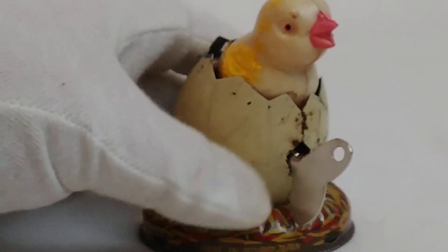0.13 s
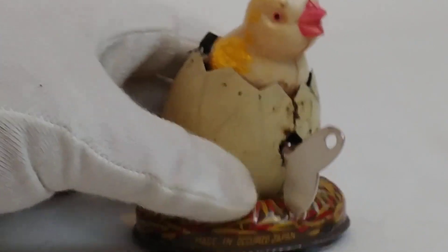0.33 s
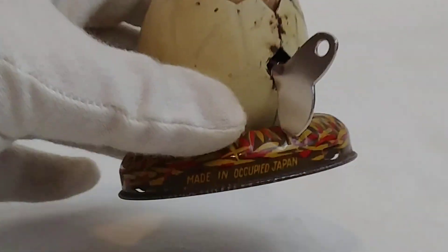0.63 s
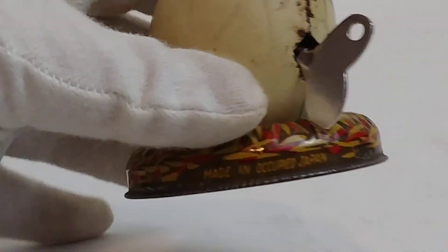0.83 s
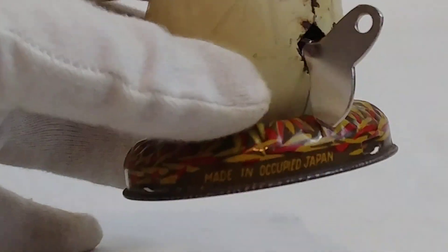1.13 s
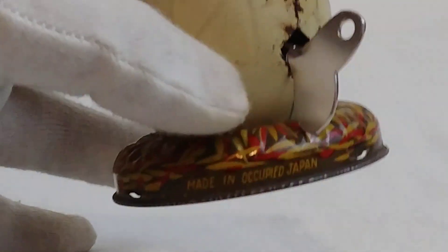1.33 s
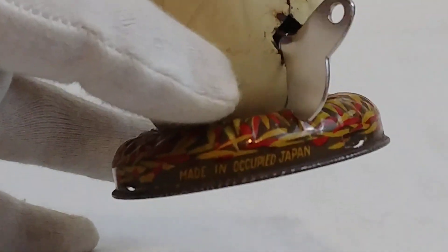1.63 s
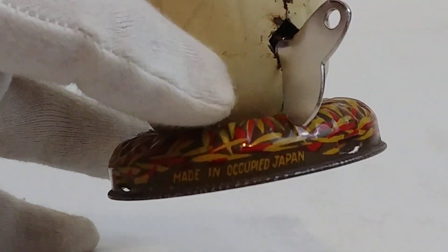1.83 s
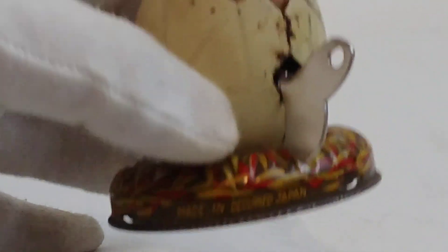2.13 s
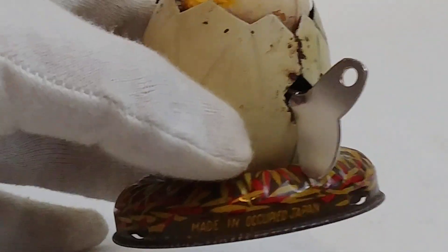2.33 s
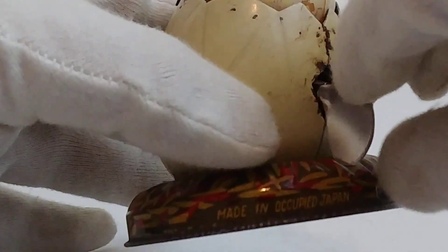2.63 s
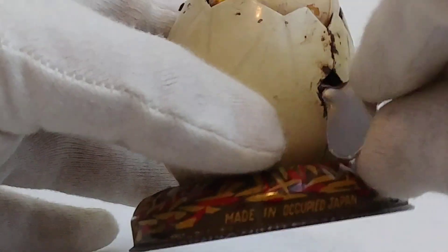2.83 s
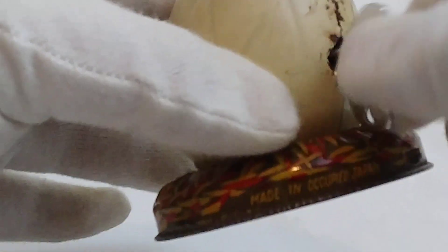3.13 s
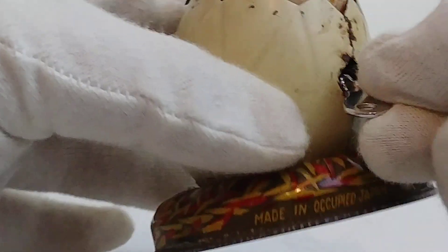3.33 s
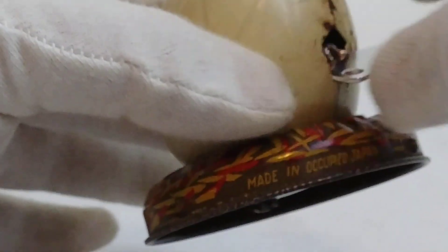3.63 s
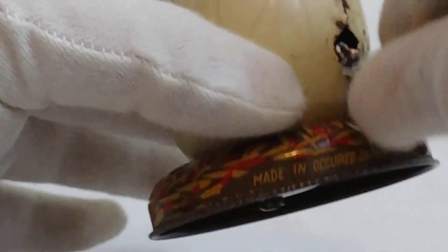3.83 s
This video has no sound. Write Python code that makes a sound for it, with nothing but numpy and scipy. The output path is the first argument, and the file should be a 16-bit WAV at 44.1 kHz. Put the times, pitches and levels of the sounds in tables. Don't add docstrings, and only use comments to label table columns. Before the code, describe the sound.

A metal key winds a small tin toy: after soft glove rustle and sparse taps, a dense burst of uneven bright clicks with spring rattle, a short lull, then a second winding begins, close in a quiet room.

```python
import sys
import numpy as np
from scipy import signal
from scipy.fft import rfft, irfft
from scipy.io import wavfile
from scipy.ndimage import uniform_filter1d

SR = 44100
rng = np.random.default_rng(int(sys.argv[2]) if len(sys.argv) > 2 else 0)


def put_to_file(sound):
    columns = np.atleast_2d(sound).T
    safe = np.clip(columns, -1, 1)
    whole_steps = np.round(safe * 32767)
    wavfile.write(sys.argv[1], SR, whole_steps.astype(np.int16))


def level_to_linear(level):
    exponent = np.asarray(level, float) / 20
    return 10 ** exponent


N = 176400
HIT_N = 2048


def evened(x):
    return x / np.sqrt(np.mean(x ** 2) + 1e-20)


def read(points, hz):
    f, value = np.transpose(points)
    return np.interp(np.log(hz + 1), np.log(f + 1), value)


def curve(points):
    return np.interp(np.arange(N) / SR, *np.transpose(points))


def ring(x, hz, width_hz):
    radius = np.exp(-np.pi * width_hz / SR)
    w = 2 * np.pi * hz / SR
    return signal.lfilter([0, np.sin(w)], [1, -2 * radius * np.cos(w), radius ** 2], x)


def colour(x, points):
    log_gain = np.log(level_to_linear(read(points, abs(np.fft.fftfreq(2048, 1 / SR)))))
    spectrum = np.exp(log_gain - 1j * signal.hilbert(log_gain).imag)
    taps = np.fft.ifft(spectrum).real[:1024]
    return signal.oaconvolve(x, taps)[:len(x)]


# (frequency [Hz], level per Hz [dB])
ROOM_NOISE = [(35, -65), (58, -4), (90, 2.5), (380, -9.5), (560, -15), (2000, -24.5), (10500, -39),
              (15000, -34)]
# (frequency [Hz], width [Hz], level [dB])
VENT_HUMS = [(70.4, 7.9, -54), (218.1, 7.4, -65), (256.6, 3.1, -69.5), (297, 53, -66.5),
             (382.2, 8.7, -69.5)]
# (frequency [Hz], correlation [0-1])
ROOM_LIKENESS = [(60, 1), (300, 0.9), (700, 0.0209)]
# (frequency [Hz], left over right [dB])
ROOM_BALANCE = [(60, 5), (2400, 1)]


def air():
    hz = np.fft.rfftfreq(N, 1 / SR)
    a, b, c, d = rng.standard_normal((4, len(hz)))
    power = evened(level_to_linear(read(ROOM_NOISE, hz))) ** 2 * level_to_linear(2 * -59.5)
    for f, width, db in VENT_HUMS:
        bump = 1 / (1 + (2 * (hz - f) / width) ** 2) ** 2
        power = power + level_to_linear(2 * db) * bump / bump.mean()
    same = np.clip(read(ROOM_LIKENESS, hz), -1, 1)
    left = a + 1j * b
    right = same * left + np.sqrt(1 - same ** 2) * (c + 1j * d)
    balance = level_to_linear(read(ROOM_BALANCE, hz) / 2 * np.array([[1], [-1]]))
    return irfft(np.array([left, right]) * np.sqrt(power * N / 2) * balance, N)


# (time [s], level [dB])
GLOVE_SLIDE = [
    (.18, -65.5),
    (.3, -68),
    (.5, -63.5),
    (.6, -83),
    (.78, -93),
    (.81, -74),
    (.86, -89),
]


def glove():
    pressure = evened(uniform_filter1d(rng.standard_normal(N), size=200))
    grain = rng.standard_normal(N) * level_to_linear(2 * pressure)
    cloth = colour(grain, [(500, -5), (8000, -17.5), (10000, -28.5)])
    return level_to_linear(curve(GLOVE_SLIDE)) * evened(cloth)


# (frequency [Hz], level [dB])
SQUEAK_BANDS = [(2060, 2), (3980, -0.5), (5750, -8)]


def squeak_and_thump():
    t = np.arange(N) / SR
    start_s, length_s, fade_s = 1.219, 0.045, 0.0089
    gate = np.clip(np.minimum(t - start_s, start_s + length_s - t) / fade_s, 0, 1)
    squeak = sum(evened(ring(rng.standard_normal(N), hz, 200)) * level_to_linear(db) for hz, db in SQUEAK_BANDS)
    thump_s, thump_hz, width_hz = 3.234, 240, 110
    push = (np.arange(N) == round(thump_s * SR)).astype(float)
    thump = ring(ring(push, thump_hz, width_hz), thump_hz, width_hz)
    return level_to_linear(-68) * gate * squeak + level_to_linear(-42) * thump / abs(thump).max()


def modes(x, table, grip=np.zeros((9, 2))):
    spread_db, detune, widen = 11, 0.016, 3
    out = 0
    for k, (hz, width, db) in enumerate(table):
        strength = (-1) ** k * level_to_linear(db + spread_db * grip[k, 0]) * np.sqrt(width)
        out = out + strength * ring(x, hz * (1 + detune * grip[k, 1]), width * widen)
    return out


# (frequency [Hz], width [Hz], level [dB])
HOLLOW_MODES = [(788, 23, -7.5), (1120, 420, -3), (1520, 42, 1.5), (2355, 340, -8.5)]


def hollow(x, grip=np.zeros((9, 2))):
    return modes(x, HOLLOW_MODES, grip)


# (frequency [Hz], width [Hz], level [dB])
SHELL_MODES = [(2635, 13, -8), (3230, 42, -4), (4280, 63, -9.5), (4083, 430, 2), (4870, 234, 4),
               (6410, 64, 1), (7370, 67, -6)]
# (frequency [Hz], level [dB])
SNAP_COLOUR = [(900, -23), (1500, -19), (2000, -9.5), (4900, 8.5), (5800, 2), (8500, 3.5), (10200, -31)]


def tin(x, grip=np.zeros((9, 2))):
    return level_to_linear(-3) * evened(colour(x, SNAP_COLOUR)) + level_to_linear(-4) * evened(modes(x, SHELL_MODES, grip))


# (time [s], level [dB])
KEY_EFFORT = [(2.69, -83), (2.72, -69), (2.76, -77.5), (2.82, -60.5), (2.87, -79), (2.91, -55.5),
              (3.06, -51), (3.17, -48.5), (3.3, -56), (3.40, -68.5), (3.52, -56), (3.56, -104.5),
              (3.845, -77), (3.87, -74), (4.0, -49)]


def rattle():
    ticks_per_s, spread_db = 2500, 2.5
    strength = level_to_linear(spread_db * np.minimum(rng.exponential(1, N), 4))
    ticks = strength * (rng.random(N) < ticks_per_s / SR) * rng.standard_normal(N)
    return level_to_linear(curve(KEY_EFFORT) - 2) * (evened(tin(ticks)) + level_to_linear(-7) * evened(hollow(ticks)))


def fizz(x):
    level = np.sqrt(abs(uniform_filter1d(x ** 2, round(0.0099 * SR))))
    high = signal.butter(10, 11850, "high", fs=SR, output="sos")
    return level_to_linear(-18.5) * level * signal.sosfilt(high, rng.standard_normal(N))


def tap(peak_db, body):
    contact_s = 0.0018
    hit = rng.standard_normal(HIT_N) * np.exp(-np.arange(HIT_N) / SR / contact_s)
    sound = 0
    for hz, width, db in body:
        mode = ring(hit, hz, width)
        sound = sound + level_to_linear(db) * np.sqrt(width) * mode / abs(mode).max()
    return level_to_linear(peak_db) * sound / abs(sound).max()


def knock(peak_db, hz):
    q = 4.6
    push = (np.arange(HIT_N) == 0).astype(float)
    sound = ring(ring(push, hz, hz / q), hz, 2 * hz / q)
    return level_to_linear(peak_db) * sound / abs(sound).max()


def click(peak_db, hz, knock_db, rasp_db):
    grip = rng.uniform(-2.0, 1, (9, 2))
    contact_s = 0.00046 + 0.003 * level_to_linear(rasp_db)
    u = np.arange(HIT_N) / SR / contact_s
    hit = np.diff(rng.standard_normal(HIT_N + 1)) * u ** 0.34 * np.exp(-2 * u)
    spot_width_hz = 800
    spot = ring(ring(hit, hz, spot_width_hz), hz, 2 * spot_width_hz)
    bright = level_to_linear(4) * evened(spot) + evened(tin(hit, grip))
    low = hollow(hit, grip[::-1])
    return level_to_linear(peak_db) * (bright / abs(bright).max() + level_to_linear(knock_db + 10.0) * low / abs(low).max())


# (time [s], peak level [dB], ring [Hz], hollow knock level [dB], rasp [dB])
HANDLING = [(0.356, -47.5, 6650, -26, -3), (0.4812, -30.5, 7550, -31, -8.5), (1.8103, -61, 2340, -23, 4),
            (2.2923, -62, 2310, -10, -19.5), (2.5745, -28, 4760, -26, -15), (2.717, -47.5, 2240, -12, 13.5),
            (2.7298, -40.5, 4320, -13.5, -7), (2.7988, -50.5, 3440, -20, 8), (2.8208, -42.5, 4340, -39, 6),
            (3.7552, -56.5, 3500, -2.5, 4.5), (3.8154, -52.5, 3640, -10, 5.5)]
WINDING_CLICKS = [(2.8818, -56, 5170, -27, -1), (2.9028, -31, 3330, -32, -5.5),
                  (2.9112, -28, 4940, -37, -7), (2.9294, -31, 4870, -52, -11),
                  (2.9617, -20.5, 4140, -52, -7), (2.9646, -33, 4550, -25, -32),
                  (2.9805, -45, 4060, -15, -5), (3.0109, -22, 4600, -18, -2.5),
                  (3.028, -30, 4840, -22.5, 9), (3.0348, -31, 4580, -12, -17), (3.041, -36, 5000, -24, -2),
                  (3.0748, -52, 4960, -16, 9), (3.0827, -23, 3540, -39.5, -7), (3.0877, -28, 4780, -20, 2),
                  (3.1025, -22.5, 3470, -35, 2.5), (3.1288, -16.5, 5130, -30, -5.5),
                  (3.1334, -31, 4880, -25, -4)]
MORE_WINDING_CLICKS = [(3.161, -22, 4900, -26.5, 2.5), (3.1641, -28.5, 4650, -27, 8),
                       (3.1673, -21.5, 4500, -28.5, -13), (3.1751, -19.5, 5040, -33, -9.5),
                       (3.178, -31, 4430, -10, -6), (3.2076, -21, 4870, -49, -2),
                       (3.2252, -27.5, 4800, -31, -7), (3.2521, -24, 4880, -26, 0),
                       (3.2619, -26.5, 4980, -26.5, -1), (3.2992, -34, 4800, -35, -14),
                       (3.3136, -24.5, 3860, -24, -3), (3.3481, -35.5, 8350, -25, 0),
                       (3.353, -37, 3440, -28, -5), (3.3579, -19.5, 4480, -38, -1),
                       (3.4202, -41.5, 4320, -9.5, 0), (3.4298, -40, 3260, -32, -6),
                       (3.4319, -31, 3300, -12.5, -1), (3.4493, -37, 3600, -44, -1),
                       (3.469, -42.5, 3280, -9, -22), (3.4926, -53, 4270, -7, 3.5),
                       (3.5146, -43, 3610, -10.5, 8.5), (3.5267, -45, 2530, -9, -2)]
NEXT_TURN = [
    (3.8565, -41.5, 4280, -20, -2),
    (3.8645, -36, 4600, -13.5, 10),
    (3.8868, -35, 4530, -32, -2),
    (3.9036, -42, 3540, -37, 5),
    (3.9204, -38, 7100, -34, 1),
    (3.9385, -37, 6850, -42, -11),
    (3.9548, -36.5, 7140, -23, 9.5),
    (3.9682, -34.5, 3650, -30, 5.5),
    (3.9769, -26.5, 4300, -48, 1.5),
    (3.987, -29, 3730, -25, 4),
]
# (time [s], peak level [dB], ring [Hz])
SPRING_SLIPS = [(2.920, -33, 5050), (2.969, -33.5, 3550), (2.9735, -42, 4000), (2.993, -36, 4520),
                (3.0535, -36, 4870), (3.0596, -34, 4940), (3.0946, -34, 3300), (3.2132, -32, 4800),
                (3.2287, -28.5, 4800), (3.2756, -34, 4550), (3.3113, -34, 3500), (3.327, -37, 6520),
                (3.52, -39, 3260), (3.8802, -30, 4570), (3.89, -32, 4270), (3.8935, -45, 4460),
                (3.9082, -44, 3530), (3.948, -41, 3280), (3.959, -41, 7000), (3.983, -34, 3400),
                (3.9914, -28, 3700)]
# (time [s], peak level [dB], pitch [Hz])
BASE_KNOCKS = [(2.918, -55.5, 800), (3.012, -54, 1400), (3.082, -44, 1490), (3.13, -42, 874),
               (3.167, -41, 1180), (3.224, -48, 826), (3.272, -49.5, 800), (3.276, -40, 1250),
               (3.316, -40, 1530), (3.325, -46, 1430), (3.361, -37.5, 1633), (3.371, -46, 1150),
               (3.419, -51, 950), (3.429, -38, 1100), (3.514, -44.5, 1338), (3.864, -45, 1730)]
# (time [s], peak level [dB])
RIM_TOUCH = (.357, -40)
BASE_TOUCH = (2.2935, -39.5)
KEY_TOUCH = (2.5745, -26)
LID_TOUCH = (.4812, -28)
# (frequency [Hz], width [Hz], level [dB])
RIM_MODES = [(1680, 87, 5), (3450, 190, -2.5), (4700, 330, -2.5), (6360, 170, -3.5)]
BASE_MODES = [(800, 200, -5.5), (1330, 540, 6), (2390, 230, -32.5), (5730, 620, -8.5)]
KEY_MODES = [(963, 39, -16), (1107, 64, -10), (1541, 44, -7.5), (4550, 68, 1), (4800, 160, 4),
             (6520, 77, -4), (7400, 91, -11), (7390, 75, -3)]
LID_MODES = [(600, 400, -15), (1130, 240, -10), (3580, 300, -4.5), (4760, 350, -2), (6150, 270, 5),
             (7700, 560, -5), (8380, 300, -11)]


def clicks():
    hits = []
    for s, *row in HANDLING + WINDING_CLICKS + MORE_WINDING_CLICKS + NEXT_TURN:
        hits.append((s, click(*row)))
    for s, db, hz in SPRING_SLIPS:
        hits.append((s, click(db, hz, knock_db=-29.5, rasp_db=-7.5)))
    for s, db, hz in BASE_KNOCKS:
        hits.append((s, knock(db, hz)))
    for (s, db), body in ((RIM_TOUCH, RIM_MODES), (BASE_TOUCH, BASE_MODES),
                          (KEY_TOUCH, KEY_MODES), (LID_TOUCH, LID_MODES)):
        hits.append((s, tap(db, body)))
    out = np.zeros(N + HIT_N)
    for s, sound in hits:
        out[round(s * SR):][:HIT_N] += sound
    return out[:N]


# (frequency [Hz], left over right [dB])
BODY_SHADOW = [(2400, 2), (4500, 9), (5800, 7.5), (7500, 38), (13000, 13)]
# (frequency [Hz], phase lag [rad])
PORT_LAG = [(0, -0.5), (1460, 1.5), (5000, 11.5), (16000, 31)]


def ports(x):
    likeness, scatter_hz = 0.82, 3500
    hz = np.fft.rfftfreq(N, 1 / SR)
    scatter = rng.standard_normal(128) * np.exp(-np.arange(128) / 30)
    scattered = rfft(scatter / np.linalg.norm(scatter), N) * hz / (hz + scatter_hz)
    path = likeness + np.sqrt(1 - likeness ** 2) * scattered
    path = path * level_to_linear(-read(BODY_SHADOW, hz)) * np.exp(-1j * np.interp(hz, *np.transpose(PORT_LAG)))
    return np.array([x, irfft(rfft(x) * path, N)])


# (frequency [Hz], time to fall 60 dB [s])
ROOM_DECAY = [(500, 0.13), (9000, 0.052)]


def echo(x):
    taps = np.zeros((2, SR // 2))
    at = np.arange(120, SR // 2 - 20, 20)
    at = at + rng.integers(0, 20, (2, len(at)))
    np.put_along_axis(taps, at, rng.choice([-1., 1.], at.shape), 1)
    hz, t, z = signal.stft(taps, SR, nperseg=128)
    decay = level_to_linear(-60 * t / read(ROOM_DECAY, hz)[:, None])
    tail = signal.istft(z * decay, SR, nperseg=128)[1]
    return signal.fftconvolve(x, tail / np.linalg.norm(tail[0]), axes=1)[:, :N]


def scene():
    toy_top = signal.butter(8, 8880, fs=SR, output="sos")
    metal = signal.sosfilt(toy_top, clicks() + rattle())
    toy = ports(level_to_linear(5.0) * (metal + fizz(metal) + glove() + squeak_and_thump()))
    return toy + level_to_linear(-8.5) * echo(toy) + air()


def top_cut(x):
    return signal.sosfilt(signal.butter(12, 16640, fs=SR, output="sos"), x)


# (time [s], gain [dB])
CAMERA_GAIN = [
    (.18, -7),
    (.26, 4),
    (.5, 0.5),
    (.8, -1.5),
    (2.5, -1.5),
    (3.2, 2.5),
    (4.0, -1),
]


def record(dry):
    start_s, fade_s = 0.1762, 0.0034
    opening = np.clip((np.arange(N) / SR - start_s) / fade_s, 0, 1)
    x = dry * level_to_linear(curve(CAMERA_GAIN)) * opening
    band_limit = signal.firwin(1023, 15980, window=("kaiser", 9), fs=SR)
    x = signal.oaconvolve(x, band_limit[None], "same")
    return top_cut(x)


dry = scene()
out = record(dry)
put_to_file(out)
```